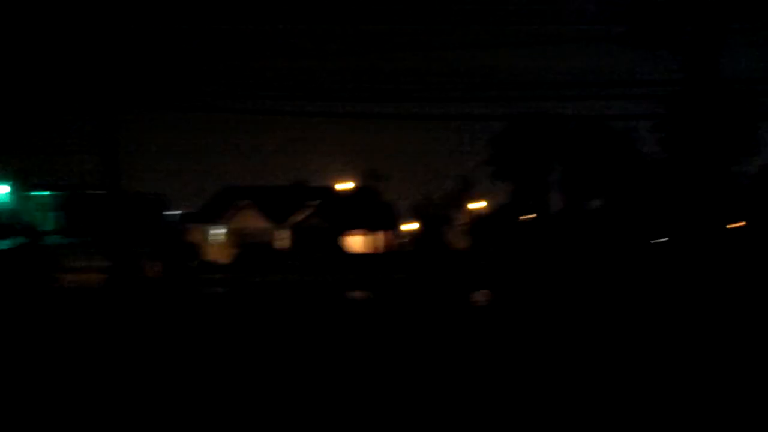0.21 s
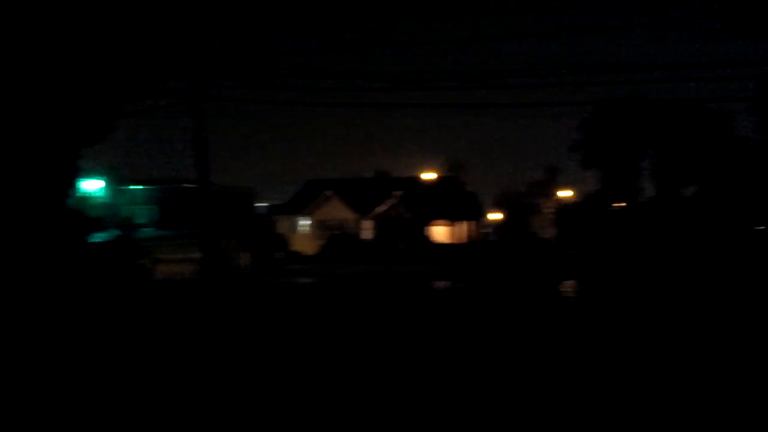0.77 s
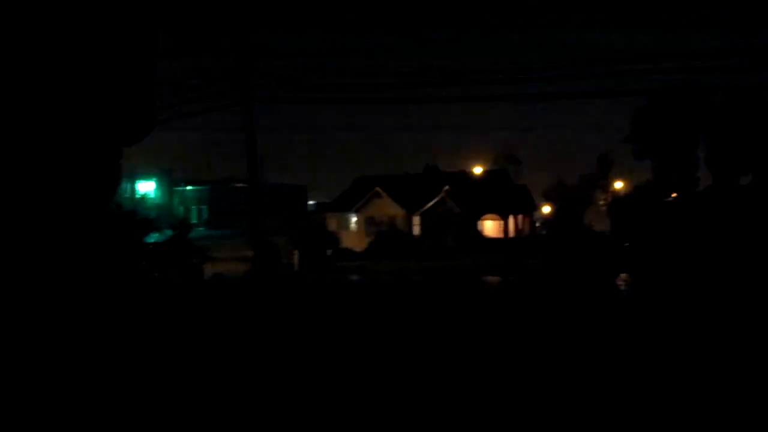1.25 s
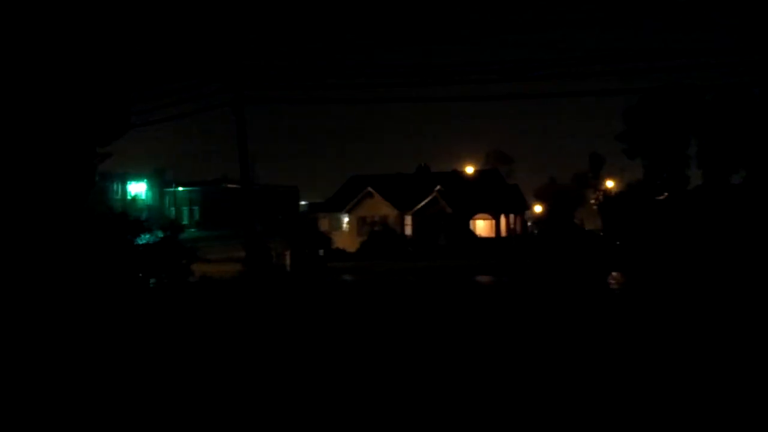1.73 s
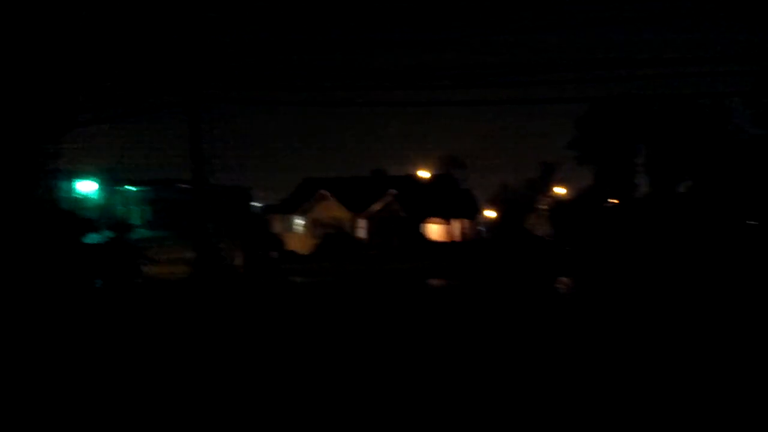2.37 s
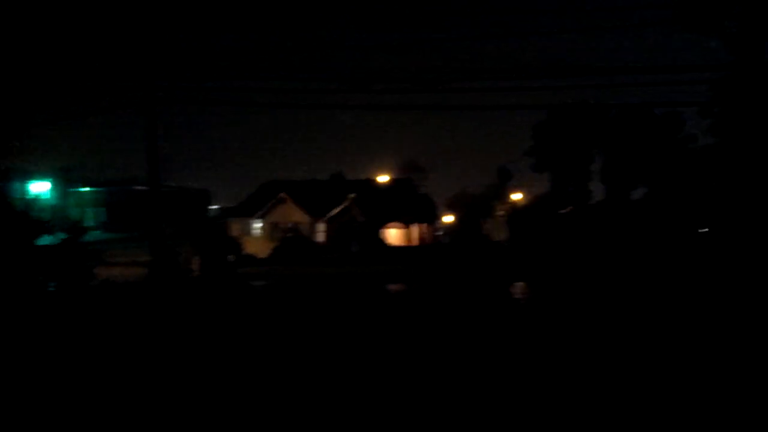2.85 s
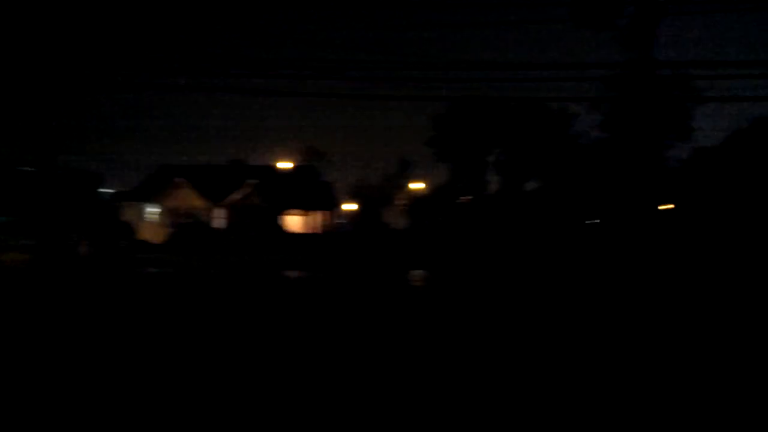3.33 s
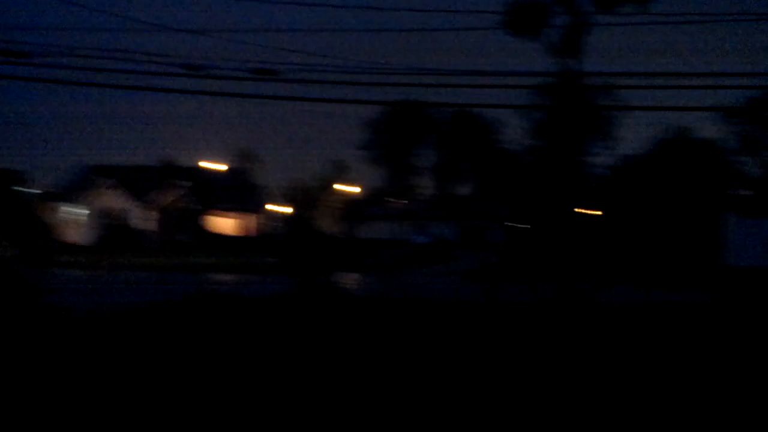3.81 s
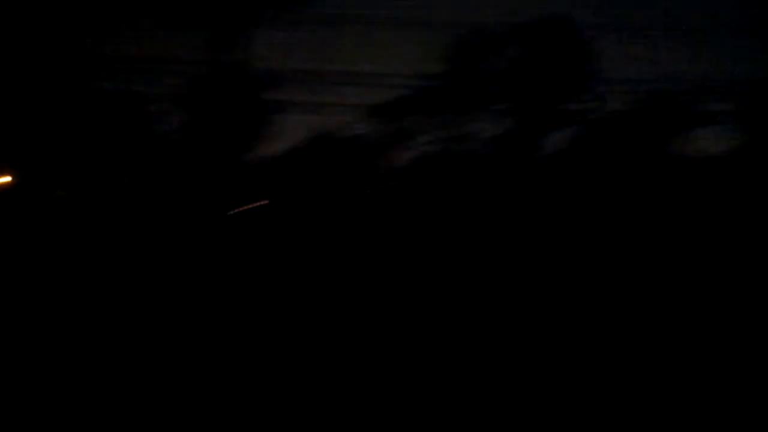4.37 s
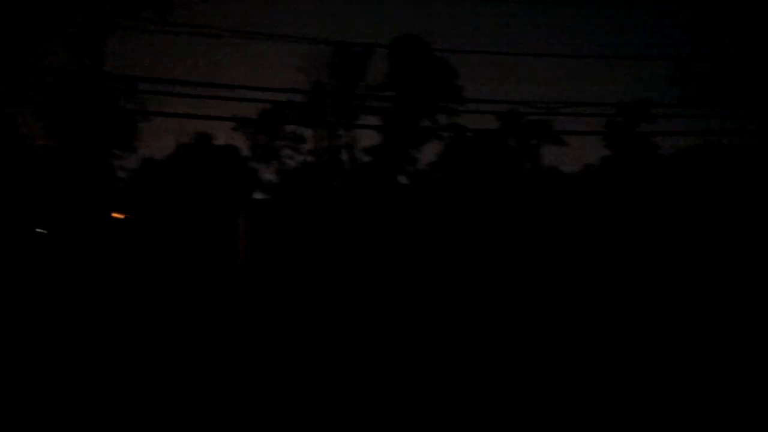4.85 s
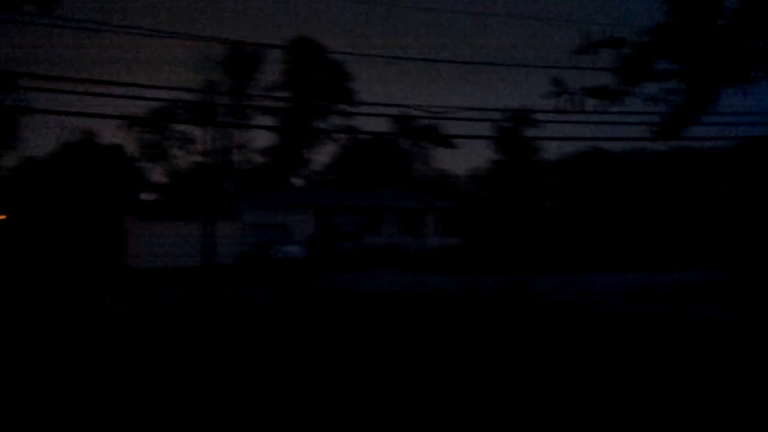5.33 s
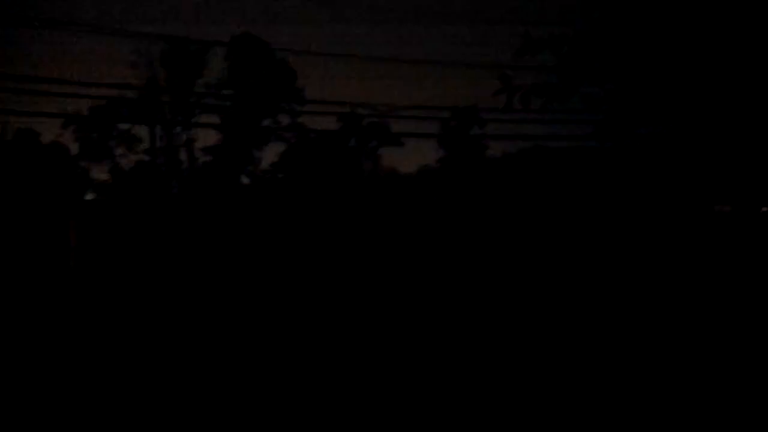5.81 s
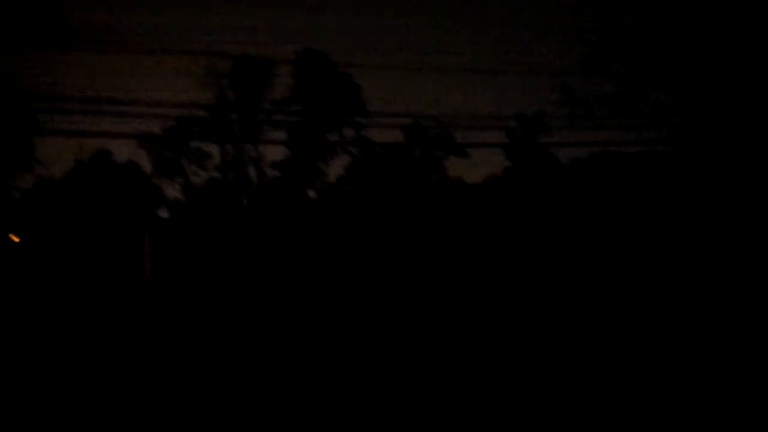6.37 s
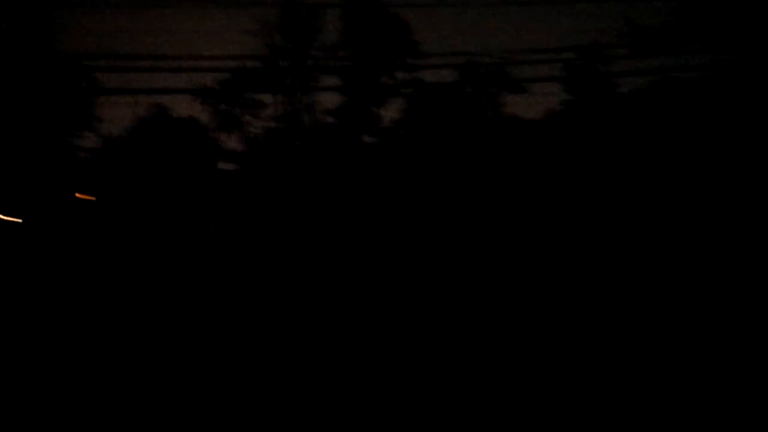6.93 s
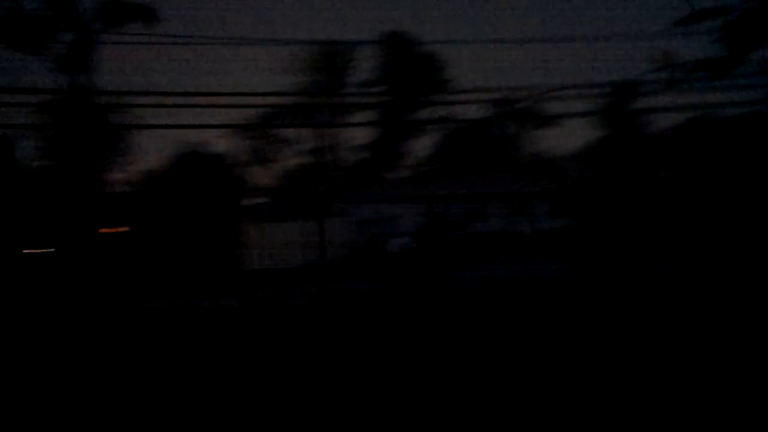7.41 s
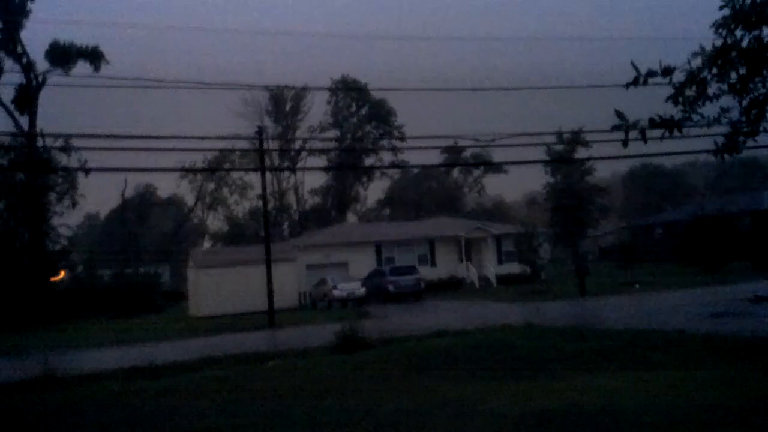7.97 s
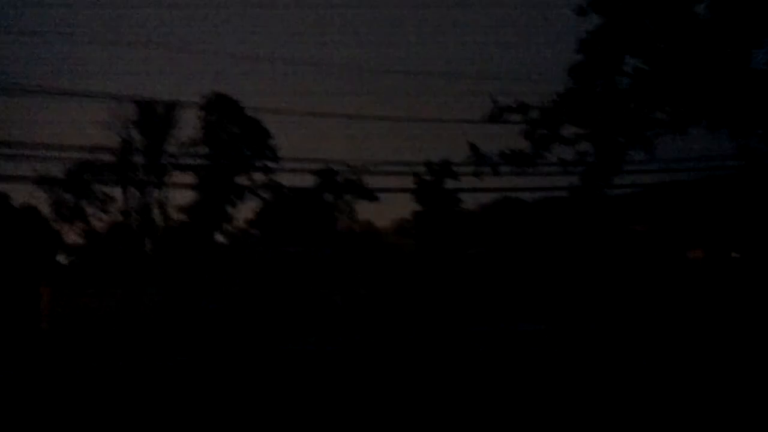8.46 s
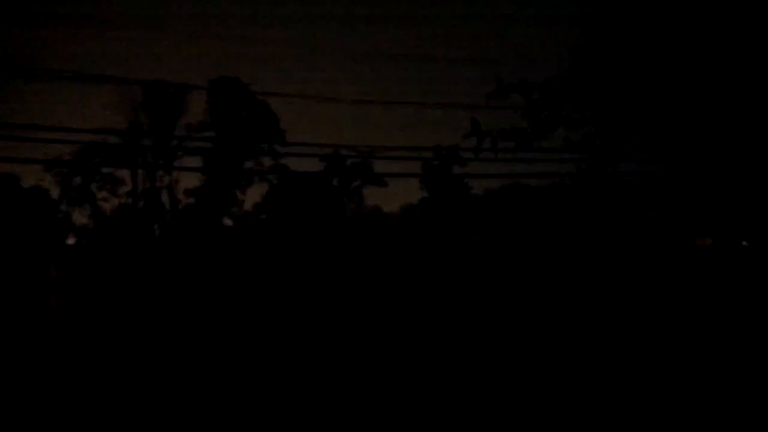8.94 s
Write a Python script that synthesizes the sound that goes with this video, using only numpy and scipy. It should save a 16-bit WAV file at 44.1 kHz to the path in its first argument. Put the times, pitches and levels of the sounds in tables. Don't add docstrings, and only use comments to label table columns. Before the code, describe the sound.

Distant thunder rolls in low, uneven swells over steady rain, then fades as big drops knock on sheet metal and splat in water close by.

```python
import sys
import numpy as np
from scipy import signal
from scipy.fft import rfft, irfft, next_fast_len
from scipy.io import wavfile
from scipy.ndimage import uniform_filter1d

SR = 44100
rng = np.random.default_rng(int(sys.argv[2]) if len(sys.argv) > 2 else 0)


def digitize_waveform(pressure):
    field = np.atleast_2d(pressure).T
    bounded = np.clip(field, -1, 1)
    quanta = np.round(bounded * 32767).astype(np.int16)
    wavfile.write(sys.argv[1], SR, quanta)


def volts_from_db(level):
    exponent = np.asarray(level, float) / 20
    return 10 ** exponent


N = 405279
PADDED = next_fast_len(N, True)
HZ = np.maximum(np.fft.rfftfreq(PADDED, 1 / SR), 1)

# start_s, level_db, tilt_db_per_octave
THUNDER_ROLL = [(0.0, -39.6, -5), (0.3, -35.5, 0), (0.9, -31.5, -6.5), (1.6, -32, -4.5), (2.2, -30, -4),
                (2.7, -29.5, -8.5), (3.2, -32, -6), (3.8, -33, -8), (4.2, -28, -5), (4.7, -31, -7),
                (5.2, -32.5, -13.5), (5.6, -39.5, -11), (6.3, -39, -9.5), (7.0, -43, -8), (7.6, -40.2, -9),
                (8.2, -49, -10), (8.7, -45, -6), (9.19, -48, -9)]
# start_s, rise_db over the roll, centre_hz, half_length_s
THUNDER_PEALS = [(0.07, -9, 190, 0.039), (0.7, -3.5, 190, 0.099), (0.89, 3.5, 250, 0.041),
                 (1.225, 8.2, 105, 0.024), (1.538, -5, 105, 0.092), (1.935, 6, 104, 0.035),
                 (2.13, 4.5, 250, 0.05), (2.34, -2, 105, 0.13), (2.511, 5.5, 190, 0.034),
                 (2.76, 3, 141, 0.088), (3.013, -2, 190, 0.093), (3.373, 3.5, 192, 0.26),
                 (3.583, -9.3, 75, 0.057), (4.03, 5, 250, 0.044), (4.094, -3, 105, 0.05),
                 (4.36, 5.5, 196, 0.05), (4.46, -5, 105, 0.033), (4.53, -12, 410, 0.21),
                 (4.535, 2, 188, 0.03), (4.58, -4, 105, 0.11), (4.82, 3.5, 138, 0.059),
                 (5.46, -10, 140, 0.03), (6.27, -8, 250, 0.036), (7.09, -15.2, 75, 0.05),
                 (7.31, -4.5, 250, 0.08), (7.37, 1, 105, 0.13), (7.938, -16, 105, 0.05),
                 (8.14, 10.8, 75, 0.069), (8.42, 9, 75, 0.093), (8.81, -11, 250, 0.08)]
# pitch_hz, level_db
THUNDER_COLOUR = [(25, -12), (50, -19), (90, -10.5), (170, 3), (270, -1.5), (330, -10), (450, -17.5),
                  (700, -46.5)]
DEPTH_EDGES_HZ = [52, 100, 190, 310, 520]
DEPTH_LIFT_DB = [-15, 4, 9.5, 4.5]
DEPTH_FLUTTER_DB = [4.7, 1.22, 0.46, 0.77]

# start_s, level_db, centre_hz, width_octaves
SHEET_KNOCKS = [(0.378, -15.5, 2680, 0.37), (0.674, -20, 2100, 0.46), (1.823, -23, 4120, 0.5),
                (1.918, -23, 2370, 0.57), (2.165, -22, 4000, 0.22), (2.658, -31, 3920, 0.9),
                (3.071, -29, 2530, 0.28), (3.123, -32, 1040, 0.5), (4.079, -25.5, 830, 0.25),
                (4.19, -29, 3200, 0.4), (4.52, -29, 2400, 0.27), (4.688, -29, 3770, 2.1),
                (4.909, -27, 1580, 0.49), (5.022, -26.5, 1520, 0.29), (5.126, -29, 2840, 1.2),
                (5.814, -34, 2980, 0.9), (5.99, -29, 3500, .3), (6.172, -26, 3200, 0.24),
                (6.791, -25, 1300, 0.4), (6.899, -26, 1560, 0.47), (7.702, -18, 1400, 0.41),
                (7.938, -17.5, 4740, 0.38), (7.968, -21, 4910, 0.44), (8.16, -27, 3050, 0.7),
                (8.222, -33, 2600, 0.7), (8.358, -24, 2500, 0.87), (9.057, -19, 2920, 2.2)]
# start_s, level_db, centre_hz, width_octaves
WATER_SPLATS = [(0.246, -25, 7900, 0.4), (0.461, -21, 6310, 0.27), (0.583, -19, 6540, 0.91),
                (0.704, -23, 6260, 1.1), (1.349, -24, 6170, 0.45), (1.478, -29, 6380, 0.58),
                (2.631, -29, 5960, 1.3), (3.81, -29, 7430, 0.53), (4.997, -25.5, 5560, 1.1),
                (5.193, -32, 6280, 0.52), (5.275, -28, 6470, 0.94), (5.305, -29.5, 5530, 0.59),
                (5.44, -26.5, 7250, 0.59), (5.593, -27, 5180, 0.4), (5.658, -25.5, 7150, 0.86),
                (5.897, -23, 6400, 1), (6.117, -22, 6000, 0.6), (6.21, -27.5, 6580, 1.1),
                (6.504, -24, 11250, 0.8), (6.638, -22.5, 8140, 0.5), (7.427, -28, 9170, 0.9),
                (7.514, -21, 8630, 0.76), (8.144, -22, 9920, 0.7), (8.509, -20.5, 5650, 0.9),
                (8.532, -19, 8500, 1.4), (8.737, -23, 9150, 0.74), (8.829, -26, 7480, 0.54),
                (8.872, -23, 7720, 1.2)]
# start_s, level_db, centre_hz, width_octaves
HEAVY_BURSTS = [(1.126, -16.5, 1810, 0.62), (1.576, -23, 2080, 0.39), (2.372, -30, 9810, 0.32),
                (2.397, -24, 7150, 1.4), (3.611, -25.5, 2900, 0.63), (4.263, -26, 4190, 0.65),
                (5.103, -31, 4400, 0.7), (6.284, -25, 6200, 0.54), (6.595, -26, 5260, 0.4),
                (6.923, -19, 2600, 0.79), (7.278, -23.5, 3940, 0.48), (7.738, -19.5, 7500, 0.91),
                (8.296, -24, 10860, 0.5)]
# pitch_hz, level_db, t60_s
SHEET_MODES = [(1140, -4.5, 0.051), (1500, -1.5, 0.046), (1610, -3, 0.067), (2106, -0.5, 0.052),
               (4130, -2.5, 0.032)]
# start_s, peak_db, pitch_hz
SQUARE_HITS = [(4.9121, -26, 1500), (5.0237, -25, 1580), (5.79, -35, 1600), (5.9, -28, 1630),
               (6.2506, -24.5, 1610), (6.35, -27, 1610), (6.4576, -30, 1620), (6.791, -27, 1480),
               (6.8482, -23, 1670), (6.898, -25, 1520), (7.032, -21, 1590), (7.069, -25, 1610),
               (7.215, -24, 1570), (7.2932, -35, 1470), (7.4538, -25, 1500), (7.476, -36, 1610),
               (7.7053, -35, 1460), (7.7384, -23, 1610), (7.8123, -26, 1604), (7.905, -22, 1470),
               (8.363, -21.5, 1600), (8.4635, -28, 1600), (8.61, -24, 1610), (8.6611, -29, 1500),
               (8.8616, -24, 1610), (8.9814, -27, 1450), (8.9995, -21, 1580), (9.065, -21.5, 1610)]
# start_s, level_db
SHEET_TAPPING = [(0, -51), (2.3, -50), (3, -56), (4.7, -53.5), (5.8, -49), (7, -50.5), (8, -44.5),
                 (9.19, -44)]

# start_s, hiss_db
RAIN_LEVEL = [(0.0, -33.5), (0.41, -33), (1.33, -37.5), (1.92, -36.5), (2.28, -37.5), (2.74, -44),
              (3.07, -45), (4.07, -41), (4.63, -41.5), (6.09, -39), (6.37, -37), (7.47, -34), (7.96, -35.5),
              (8.37, -34), (8.7, -35.5), (9.19, -33.5)]
# pitch_hz, level_db
RAIN_COLOUR = [(30, -18), (100, 15), (200, 17.5), (330, 12.5), (500, 7), (800, 3), (1600, 1), (3000, -2.5),
               (5000, -2), (8000, -2), (11000, -4), (13000, -8), (16000, -11)]

# pitch_hz, level_db, tied_share (0-1), lead_rad
PORT_DIFFERENCE = [(40, -10.5, 0.2, .4), (70, 1, 0.93, 0.25), (120, -8, 0.92, 0.18),
                   (270, -12.5, 0.8, 0.36), (480, -8, 0.4, -0.35), (800, -5, 0.83, -.6),
                   (1210, 1.5, 0.7, -0.45), (2980, 0.5, 0.12, 0.64), (16000, -0.3, 0, -0.43)]
# pitch_hz, share (0-1)
BODY_SHADOW = [(400, 0.022), (700, 0.15), (1500, 0.11), (4000, 0.06), (9000, 0.31), (14000, .04)]
# pitch_hz, level_db
RIGHT_CAPSULE = [(350, -0.53), (650, -0.16), (2000, 2.15), (5000, 2.25), (9000, 1.1), (13000, 0.4)]


def in_time(rows):
    s, *columns = np.transpose(rows)
    return [np.interp(np.arange(N) / SR, s, column) for column in columns]


def in_pitch(rows):
    hz, *columns = np.transpose(rows)
    return [np.interp(np.log(HZ), np.log(hz), column) for column in columns]


def rms_one(x):
    return x / np.sqrt(np.mean(x ** 2) + 1e-20)


def shaped(x, gain):
    return irfft(rfft(x, PADDED) * gain, PADDED)[..., :N]


def band(x, low_hz, high_hz, order=2):
    edges_hz = [low_hz, min(high_hz, 0.45 * SR)]
    return signal.sosfilt(signal.butter(order, edges_hz, "band", fs=SR, output="sos"), x)


def ring(push, hz, t60):
    r, w = volts_from_db(-60 / (t60 * SR)), 2 * np.pi * hz / SR
    return signal.lfilter([0, np.sin(w)], [1, -2 * r * np.cos(w), r * r], push + 1e-18)


def clicks(per_s, spread_db, channels=1):
    out, count = np.zeros((channels, N)), round(per_s * N / SR)
    for row in out:
        place, size, sign = rng.random((count, 3)).T
        row[(place * N).astype(int)] = volts_from_db(-spread_db * np.log(size + 0.0024)) * np.sign(sign - 0.5)
    return rms_one(out)


def late(x):
    return np.roll(x, 16, axis=-1)


def at_ports(pair):
    level_db, tied, lead_rad = in_pitch(PORT_DIFFERENCE)
    tied = np.clip(tied, 0, 1)
    shares = np.array([tied * np.exp(1j * lead_rad), np.sqrt(1 - tied ** 2)])
    apart = shaped(pair, volts_from_db(level_db) * shares).sum(axis=0)
    return pair[0] + apart * [[1], [-1]]


def peals(octave):
    t, db = np.arange(0, N, 64) / SR, 0
    for s, rise_db, hz, half_s in THUNDER_PEALS:
        pitch_gap = (octave - np.log2(hz / 210)) / 0.71
        db = db + rise_db * np.exp(-pitch_gap ** 2 - ((t - s) / half_s) ** 2)
    return np.interp(np.arange(N) / SR, t, db)


def flutter():
    size = round(0.053 * SR)
    return rms_one(uniform_filter1d(uniform_filter1d(rng.standard_normal(N), size), size))


def evened(x, over_s, depth):
    swell = uniform_filter1d(x ** 2, round(over_s * SR))
    return rms_one(x / (swell / np.mean(swell) + 0.05) ** (depth / 2))


def thunder():
    shocks = shaped(clicks(per_s=900, spread_db=2.5, channels=2), volts_from_db(in_pitch(THUNDER_COLOUR)[0]))
    level_db, tilt_db = in_time(THUNDER_ROLL)
    overlap, out = 1.077, 0
    depths = zip(DEPTH_EDGES_HZ, DEPTH_EDGES_HZ[1:], DEPTH_LIFT_DB, DEPTH_FLUTTER_DB)
    for low, high, lift_db, lump_db in depths:
        octave = np.log2(np.sqrt(low * high) / 210)
        roll_db = level_db + tilt_db * octave + lift_db
        roll_db = roll_db + peals(octave) + lump_db * flutter()
        fronts = band(shocks, low / overlap, high * overlap)
        out = out + volts_from_db(roll_db) * evened(fronts, over_s=0.07, depth=0.79)
    return at_ports(out)


def landings():
    drops = [(*row, 0.011) for row in SHEET_KNOCKS] + [(*row, 0.011) for row in WATER_SPLATS]
    for s, level_db, hz, octaves in HEAVY_BURSTS:
        for k in range(5):
            drops.append((s + k * 0.0048, level_db - k * 3, hz, octaves, 0.0062))
    return drops


def drips():
    out, t = np.zeros(N + SR), np.arange(round(0.12 * SR)) / SR
    for s, level_db, hz, octaves, length_s in landings():
        noise = rng.standard_normal(len(t))
        hit = noise * np.minimum(t / 0.00071, 1) * volts_from_db(-17 * t / max(length_s, 0.003))
        contact = np.hanning(12) * np.cos(np.arange(12) * np.pi * hz / 8000)
        hit[:12] += 3.9 * np.sign(noise[0]) * contact
        reach = 2 ** np.clip(0.83 * octaves, 0.1, 2)
        drop = band(hit, hz / reach, hz * reach)
        drop /= np.std(drop[:300])
        for mode_hz, mode_db, t60 in SHEET_MODES:
            chance_db = rng.normal(0, 1.9)
            stir_db = mode_db + chance_db - 41 - 24 * abs(np.log2(mode_hz / hz))
            drop += volts_from_db(stir_db) * ring(hit, mode_hz, t60)
        at = round((s + 0.0015) * SR)
        out[at:at + len(t)] += volts_from_db(level_db - 8.5) * drop
    near = out[:N]
    return np.array([near, -0.25 * late(near)])


def pings():
    out, t = np.zeros(N + SR), np.arange(90) / SR
    for s, peak_db, hz in SQUARE_HITS:
        push = np.hanning(90) * np.cos(2 * np.pi * hz * t)
        note = ring(np.pad(push, (0, 4000)), hz, t60=0.068)
        at = round(s * SR)
        out[at:at + len(note)] += volts_from_db(peak_db - 7.5) * note / np.max(abs(note))
    return out[:N] * volts_from_db([[0], [-13]])


def tapping():
    rings = 0
    for hz, mode_db, t60 in SHEET_MODES:
        rings = rings + volts_from_db(mode_db) * ring(clicks(per_s=25, spread_db=1.5)[0], hz, t60)
    return volts_from_db(in_time(SHEET_TAPPING)[0]) * rms_one(rings) * volts_from_db([[0], [-14]])


def splashes(per_s, spread_db, t60):
    r = volts_from_db(-120 / (t60 * SR))
    puffs = signal.lfilter([1 - r], [1, -r], clicks(per_s, spread_db) ** 2)
    return abs(uniform_filter1d(puffs, round(0.0091 * SR)))[0]


def rain():
    hiss_db = in_time(RAIN_LEVEL)[0]
    patter_db = 1.0 - 0.4934 * np.arange(N) / SR
    wet = shaped(rng.standard_normal((2, N)), volts_from_db(in_pitch(RAIN_COLOUR)[0]))
    wet = wet / np.std(band(wet, 2780, 12600))
    wide = splashes(per_s=30, spread_db=2.5, t60=0.093)
    edges_hz, out = [45, 600, 1200, 2200, 3300, 4800, 7000, 10000, 13000, 19000], 0
    tilts_db = [patter_db + 1.5] * 3 + [0] * 6
    nearness = [0.01, 0.26, 0.05, 0.67, 0.42, 0.36, 0.36, 0.29, 0.15]
    for low, high, tilt_db, near in zip(edges_hz, edges_hz[1:], tilts_db, nearness):
        narrow = splashes(per_s=43, spread_db=2.0, t60=0.096)
        power = 1 + near * (1.04 * wide + narrow)
        out = out + shaped(wet, (HZ >= low) & (HZ < high)) * np.sqrt(power) * volts_from_db(tilt_db)
    return at_ports(volts_from_db(hiss_db - 5.5) * out)


def scene():
    return thunder() + drips() + pings() + tapping() + rain()


def low_pass(x):
    return signal.sosfilt(signal.butter(12, 17080, fs=SR, output="sos"), x)


def record(dry):
    left, right = signal.sosfilt(signal.butter(2, 55, "high", fs=SR, output="sos"), dry)
    ports = np.array([left + shaped(late(right), in_pitch(BODY_SHADOW)[0]), right])
    lift = volts_from_db([0 * HZ, in_pitch(RIGHT_CAPSULE)[0]])
    crossed = shaped(ports - late(ports[::-1]), lift * (HZ < 15780))
    return low_pass(crossed)


dry = scene()
out = record(dry)
digitize_waveform(out)
```